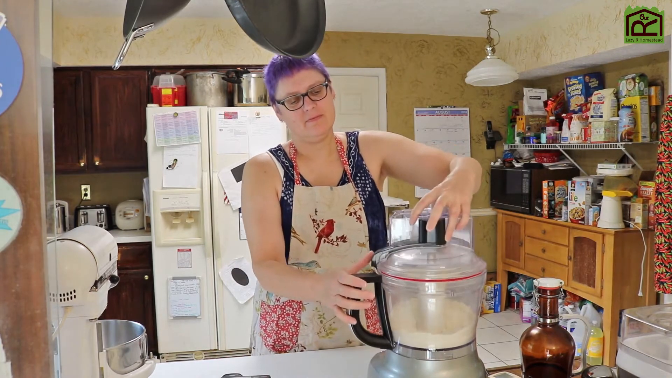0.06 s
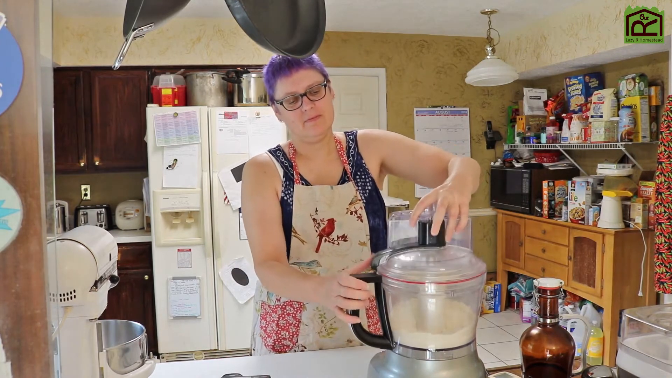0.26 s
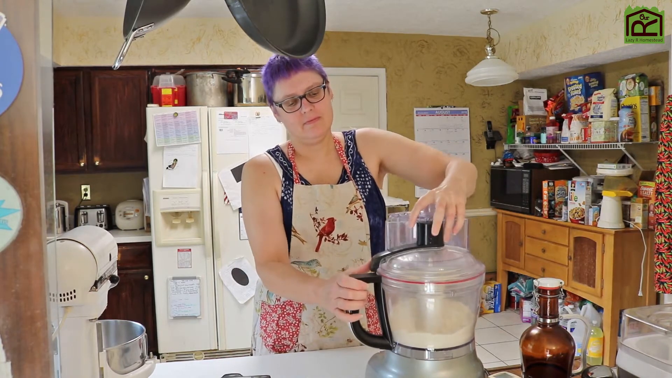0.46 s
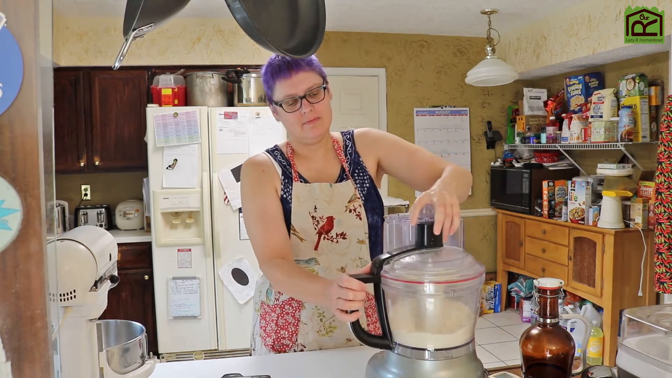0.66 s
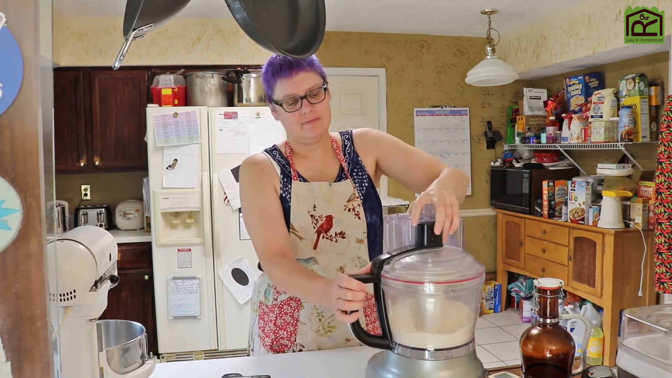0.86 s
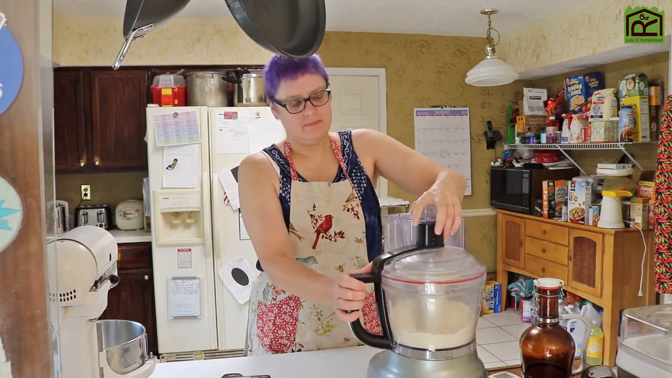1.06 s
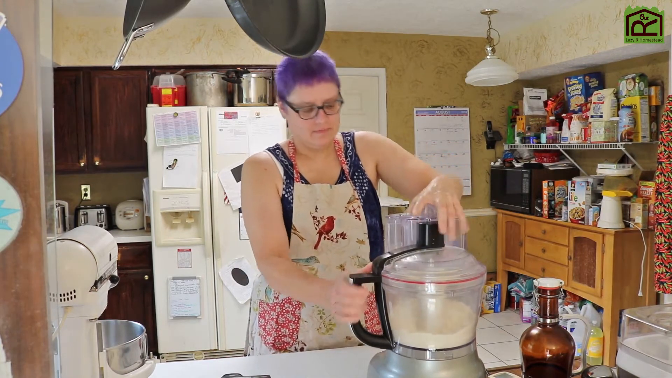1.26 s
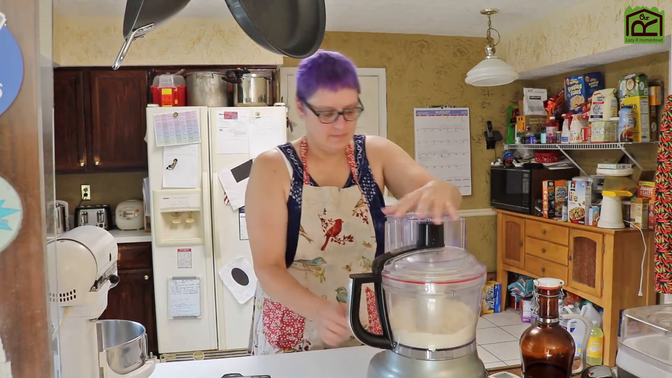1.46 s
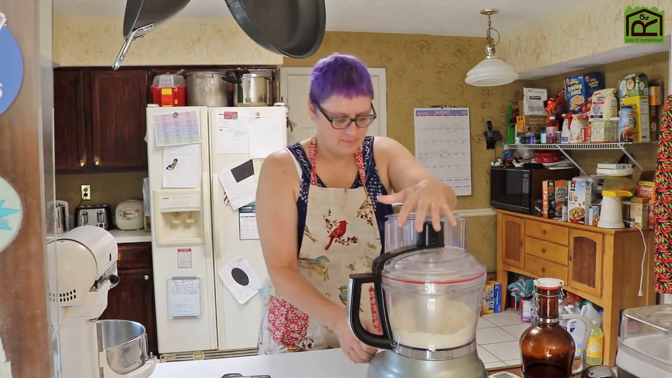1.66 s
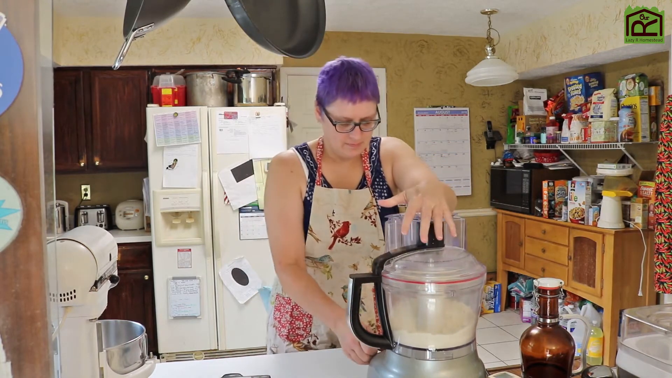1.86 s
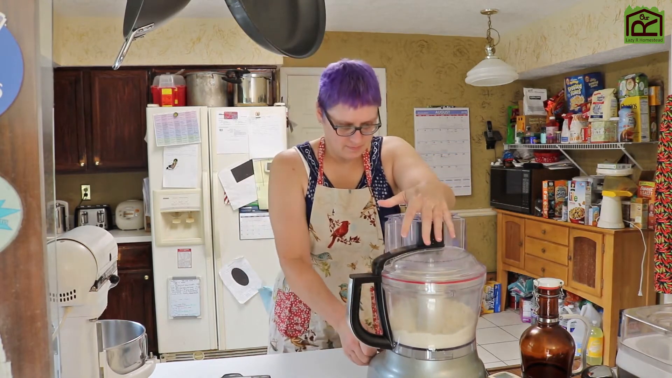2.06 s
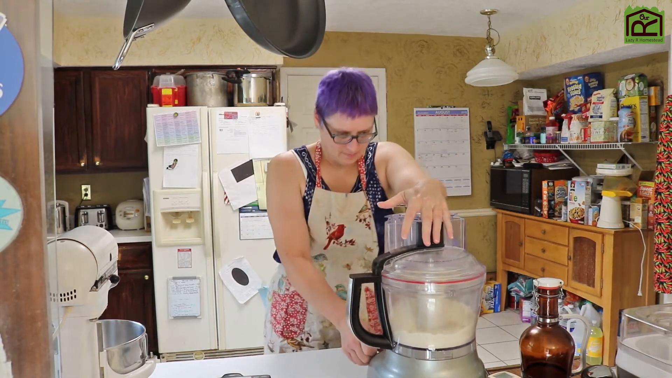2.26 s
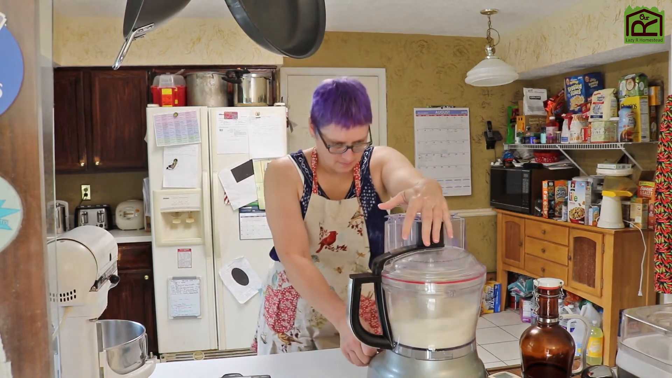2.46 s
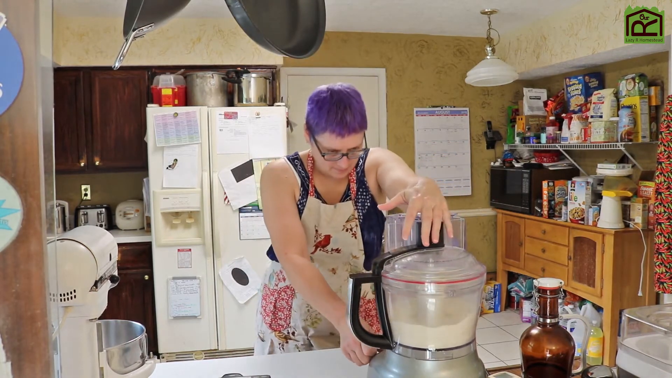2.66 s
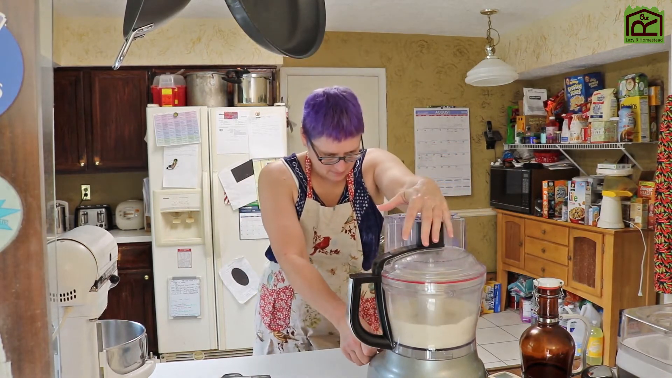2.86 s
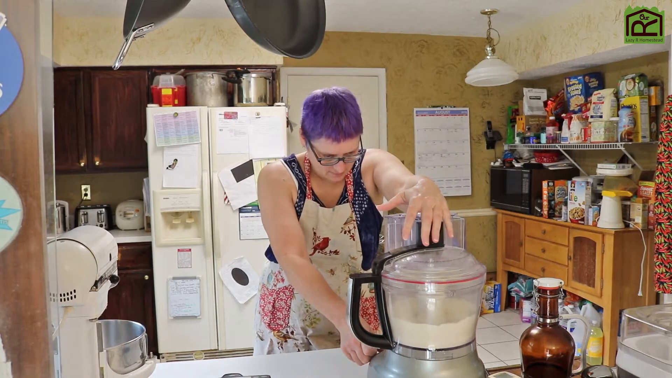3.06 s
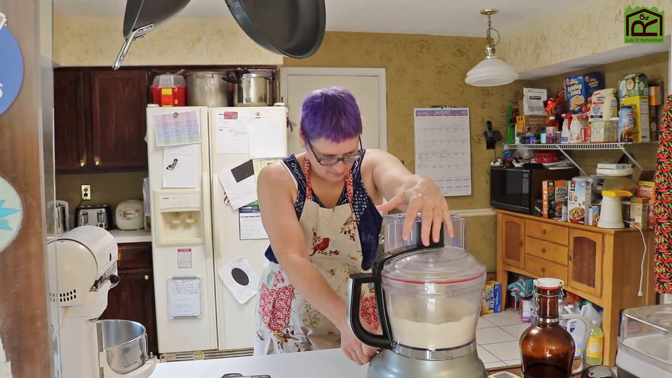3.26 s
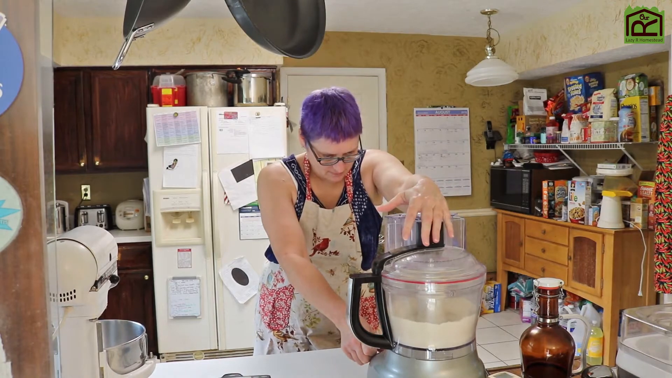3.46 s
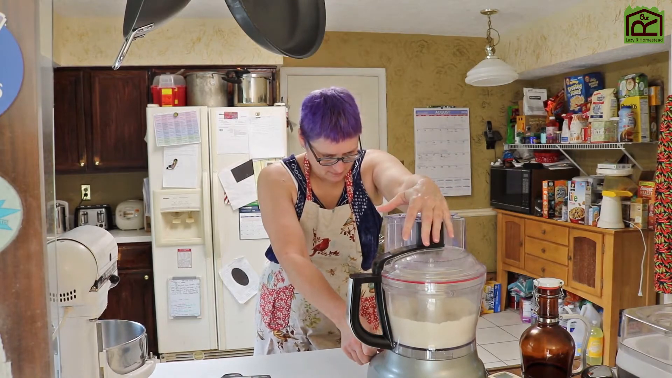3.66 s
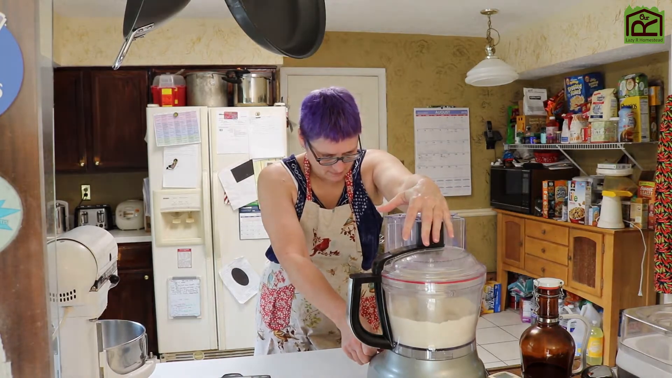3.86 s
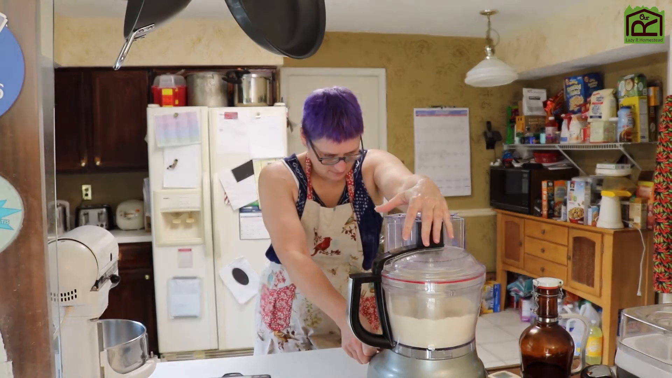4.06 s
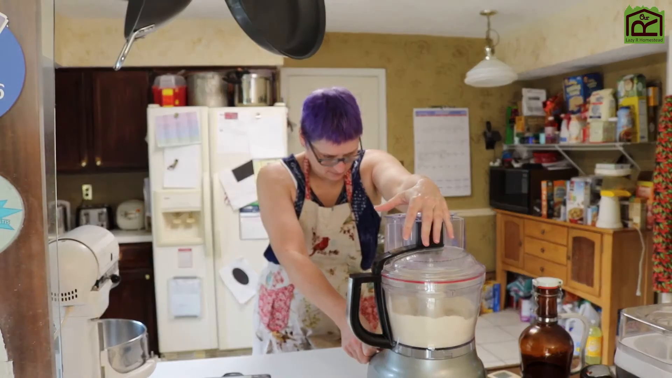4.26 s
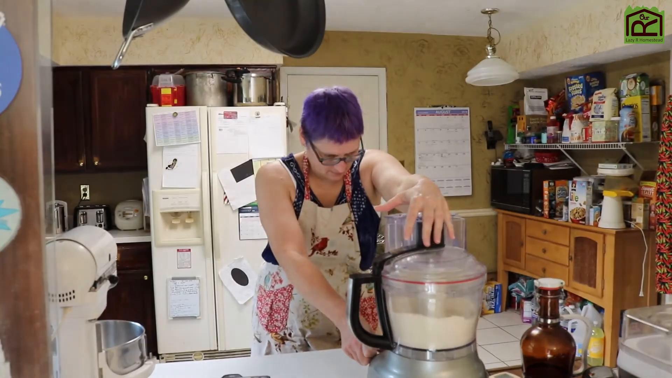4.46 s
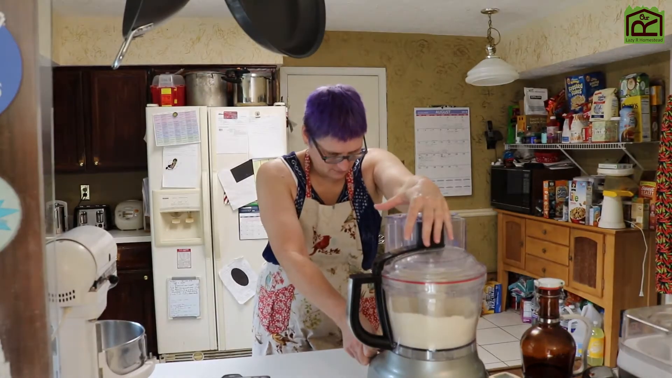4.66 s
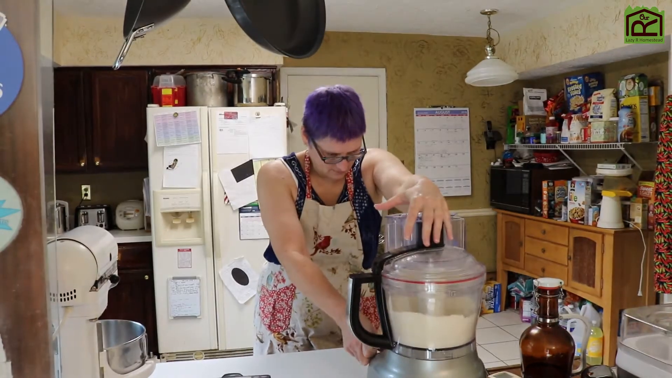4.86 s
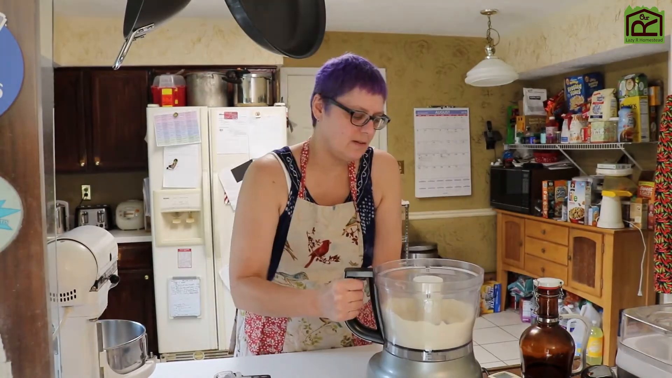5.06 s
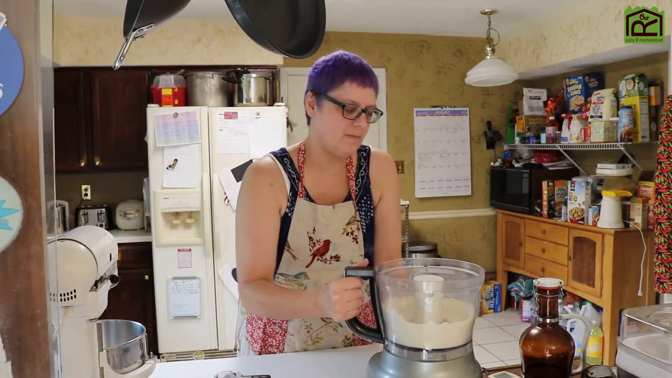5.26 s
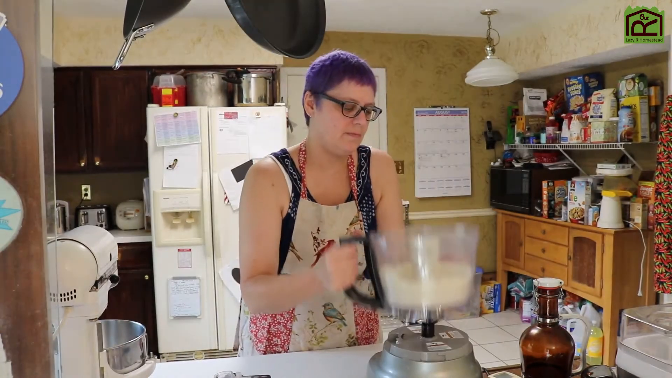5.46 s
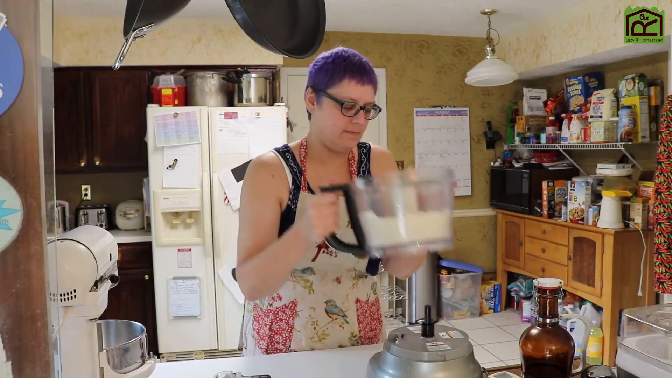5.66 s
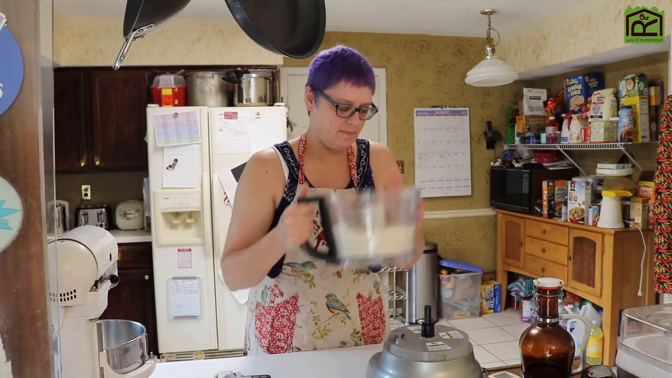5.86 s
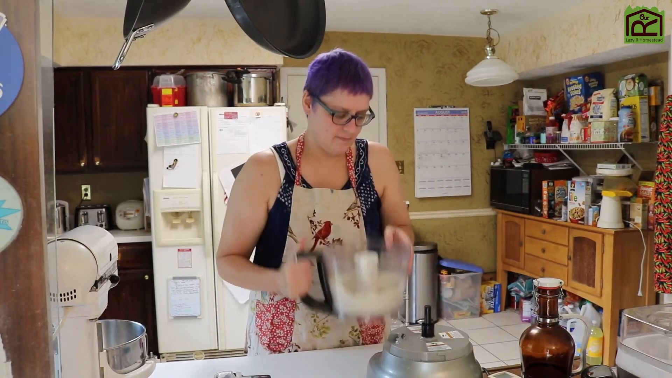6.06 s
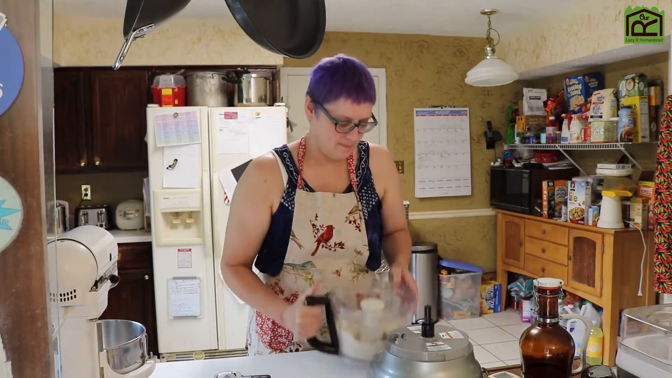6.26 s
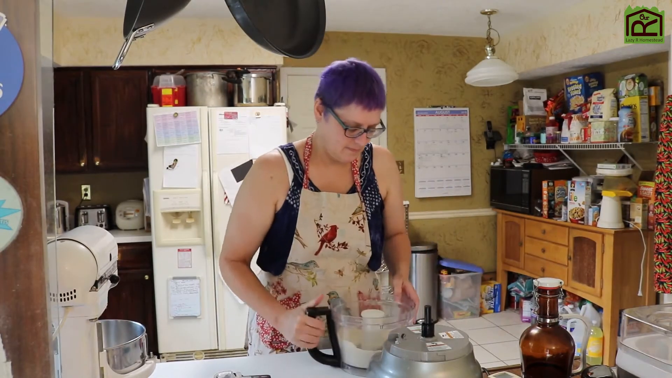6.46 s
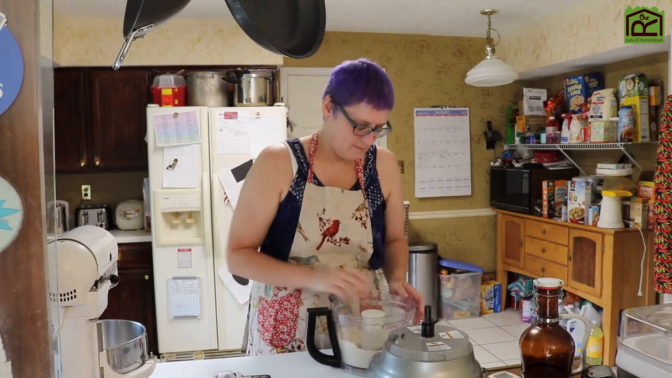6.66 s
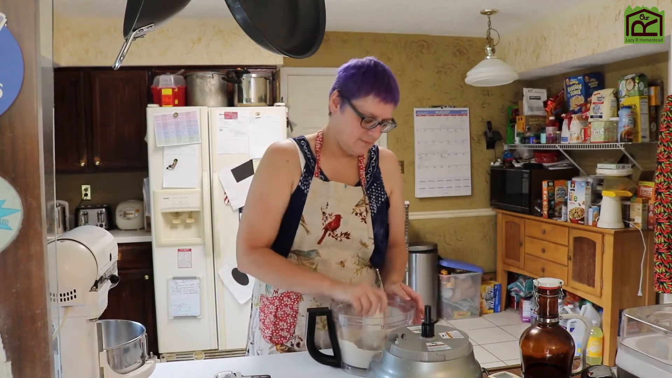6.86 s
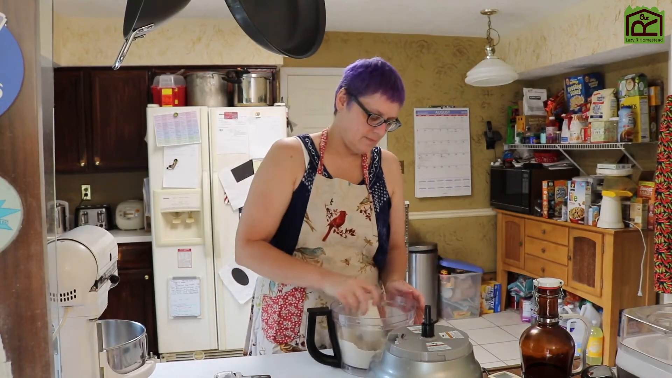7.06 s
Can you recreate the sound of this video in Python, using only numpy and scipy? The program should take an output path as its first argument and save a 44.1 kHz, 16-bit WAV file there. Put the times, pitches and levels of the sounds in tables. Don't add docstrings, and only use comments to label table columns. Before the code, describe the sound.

Close kitchen handling of hard plastic, a buzzing geared motor run suddenly played much faster, then loud bowl clatter and a faintly ringing steel blade.

```python
import sys
import numpy as np
from scipy import signal
from scipy.fft import rfft, irfft, next_fast_len
from scipy.io import wavfile
from scipy.ndimage import uniform_filter1d

SR = 44100
rng = np.random.default_rng(int(sys.argv[2]) if len(sys.argv) > 2 else 0)


def log_audio(samples):
    frames = np.atleast_2d(samples).T
    limited = np.clip(frames, -1, 1)
    pcm = np.round(limited * 32767).astype(np.int16)
    wavfile.write(sys.argv[1], SR, pcm)


def natural_amplitude(level_db):
    exponent = np.asarray(level_db, float) / 20
    return 10 ** exponent


N = 313551
TIME = np.arange(N) / SR
MOTOR_ON_S, HASTE_ON_S, HASTE_OFF_S = 2.231, 3.918, 5.011
HASTE = 6
FULL_SPEED = 51.18

# t/s, level/dB
RUN = [(2.231, -26.5), (2.281, -28), (2.343, -22.5), (2.4, -20.5), (2.531, -14.5), (2.671, -18.5),
       (3.907, -19.5), (3.918, -34)]
# multiple of the shaft speed, level/dB rms
GEARS = [(2, -45), (18, -50), (24, -47), (26, -47), (27, -47), (28, -34), (30, -48), (32, -43), (32.5, -49),
         (34, -45), (36, -42), (38, -45), (39, -44), (40, -48), (42, -45), (43, -43), (44, -47), (45, -44),
         (46, -43), (47, -45), (48, -41), (52, -47), (54, -39), (55, -44), (56, -36.5), (58, -46),
         (60, -47), (64, -43), (65, -46), (70, -44), (72, -38), (74, -43), (76, -41), (77, -43), (79, -43),
         (80, -40), (81, -41), (84, -45), (85, -44), (88, -45), (90, -47), (92, -46), (94, -40), (108, -42),
         (110, -40), (114, -46)]
# f/Hz, level/dB per Hz
ROAR = [(400, -59), (700, -10), (1080, -15), (1400, -8), (2600, -6), (3600, -3.5), (5400, -5.5),
        (8200, -11.5), (9200, -24), (12000, -21), (12800, -33), (15000, -64), (16000, -90)]
# f/Hz, level/dB per Hz
DRONE = [(15, -56), (25, -16), (92, -16.5), (145, -20), (237, -13.5), (419, -15.5), (475, -14.5),
         (1100, -18.5), (1430, -16), (2420, -120)]


def normal_run():
    return motor((MOTOR_ON_S, HASTE_ON_S), 1, [RUN], GEARS, ROAR, DRONE,
                 low_db=(-17, 22), ring_db=(-17, 16), buzz_db=(-35, 7, 5), tone_db=19.0, hiss_db=-3.0,
                 locked=0.84, boom=0.025, unsteady_db=3, swells_per_s=24)


# t/s, level/dB
RUN_FAST = [
    [(3.918, -32), (4.484, -28.5), (4.53, -29), (4.568, -24.5), (4.612, -35.5), (4.644, -49.5), (4.69, -51)],
    [(4.699, -29.5), (4.723, -23), (4.921, -29), (4.969, -23), (5.011, -47)],
]
# multiple of the hastened shaft speed, level/dB rms
GEARS_FAST = [(1.0, -44.5), (1.5, -54), (2.0, -53), (2.5, -63), (3, -59), (3.5, -59), (4.0, -52),
              (4.5, -49), (6.0, -53), (7, -53), (7.5, -52), (12.0, -51), (14, -51), (14.5, -52), (16, -55),
              (16.5, -54), (17.0, -51), (18.0, -54), (20.0, -53), (22.0, -51), (24.0, -43), (25, -52),
              (26.0, -48), (28.0, -36), (29.0, -46), (30.0, -47), (32, -52), (33.0, -53), (34, -55),
              (35, -51), (36.0, -37), (37.0, -39), (38.0, -46), (38.5, -51), (39.0, -44), (40.0, -48),
              (42.0, -49), (42.5, -45), (43.0, -48), (43.5, -50), (45.0, -49), (45.5, -46), (46.0, -37),
              (48.0, -38), (49.5, -52), (50, -51)]
# f/Hz, level/dB per Hz
ROAR_FAST = [(2500, -59), (4000, -3.5), (6000, -4), (8500, 0.5), (10300, -3), (12500, 1), (14500, 1.5),
             (16000, 0.5)]
# f/Hz, level/dB per Hz
DRONE_FAST = [(18, -78), (30, -26), (244, -20), (303, -19), (391, -25), (455, -19.5), (2470, -8),
              (2810, -5.5), (5000, -8), (6500, -40), (11000, -120)]


def hastened_run():
    return motor((HASTE_ON_S, HASTE_OFF_S), HASTE, RUN_FAST, GEARS_FAST, ROAR_FAST, DRONE_FAST,
                 low_db=(-3, -4), ring_db=(-28, 30), buzz_db=(-34.5, 3, 1.5), tone_db=30.5, hiss_db=2.0,
                 locked=0.41, boom=0.12, unsteady_db=3.2, swells_per_s=22)


# multiple of the buzz pitch, level/dB
MAINS = [(.5, -7.5), (1, -2.5), (2, -17), (4, -23), (8, -17)]
# f/Hz, width/Hz, level/dB over the walls
HOUSING = [(506, 34, 10.5), (1020, 65, 9), (1482, 37, 6), (1900, 25, 8.5), (2120, 110, 8), (2300, 30, 7),
           (2667, 106, 8), (3570, 620, 7), (4170, 31, 9), (4700, 230, 1), (5400, 920, 4.5)]
SHAKERS = {24: 16, 48: 9, 56: 8}
# f/Hz, spread/Hz, level/dB
STANDING = [(1345, 25, 6), (2115, 30, 5), (2695, 45, 6), (3595, 80, 5)]


def motor(span, haste, run, gears, roar, drone, low_db, ring_db, buzz_db, tone_db, hiss_db, locked, boom,
          unsteady_db, swells_per_s):
    start = round(span[0] * SR)
    t = TIME[start:round(span[1] * SR)]
    roar_db, = curves(run, t)
    speed, idle_s = shaft(t)
    slip = 1 - speed / FULL_SPEED
    sweep = np.exp(-((speed / FULL_SPEED - 0.62) / 0.27) ** 4) * np.where(idle_s > 0, .55, 1)
    low_db = low_db[0] + low_db[1] * np.minimum(slip, .7)
    ring_db = ring_db[0] + ring_db[1] * sweep
    buzz_db = buzz_db[0] + buzz_db[1] * slip + buzz_db[2] * sweep - 900 * idle_s
    share = speed / speed.max()
    speed = haste * speed
    turns = np.cumsum(speed) / SR

    def sine(cycles, hz, blur=0):
        both, own = wobble(swells_per_s, len(t))
        apart = np.clip(hz / 3000, 0, 1)
        depth_db = 1.5 if blur else unsteady_db
        sides = both + apart * own * np.array([[.5], [-.5]])
        swell = natural_amplitude(1.64 * (apart - 1) + depth_db * sides)
        phase = cycles + blur * own + rng.random() + 0.27 * apart * rng.random((2, 1))
        return np.sqrt(2) * swell * np.sin(2 * np.pi * phase)

    mesh = np.clip((share - .72) / .27, 0, 1) ** (1 + haste / 4) * np.exp(-idle_s / .03)
    spun = np.clip((share - .78) / .15, 0, 1)
    whine = natural_amplitude(7) * np.exp(-((slip - 1 + .75) / .1) ** 2)
    shaking, sung = 0, 0
    for k, db in gears:
        line = natural_amplitude(db) * sine(k * turns, k * speed.max())
        shaking = shaking + natural_amplitude(SHAKERS.get(k, 0) * sweep) * line
        if k < 2:
            gain = np.sqrt(spun * mesh)
        elif k == 2:
            gain = spun
        else:
            gain = mesh + whine * (k == 56)
        sung = sung + line * gain
    sung = filtered(sung, lambda f: natural_amplitude(sum(db * np.exp(-((f / haste - hz) / spread) ** 2)
                                            for hz, spread, db in STANDING)))

    teeth = rng.standard_normal((2, 1800))
    tooth = (turns / 2 % 1 * (1800 // haste)).astype(int)
    hiss = mesh * locked * teeth[:, tooth] + grit(len(t), spiky_db=1)
    hiss = coloured(filtered(hiss, lambda f: 1 + boom * resonances(HOUSING, f / haste)), roar)
    low = coloured(mesh * locked * teeth[::-1, tooth] + grit(len(t), spiky_db=2.5), drone)

    shake = unit(shaking) + .9 * widened(grit(len(t), spiky_db=4))
    ring = unit(filtered(shake, lambda f: resonances(HOUSING, f / haste) ** 2))

    buzz_hz = haste * 480.3
    buzz = 0
    for k, db in MAINS:
        half_db = -3 * (haste > 1 > k)
        buzz = buzz + natural_amplitude(db + half_db) * sine(np.round(2 * k) / 2 * buzz_hz * t, k * buzz_hz, .04 * k)

    machine = natural_amplitude(tone_db) * sung + natural_amplitude(hiss_db) * hiss + natural_amplitude(ring_db) * ring + natural_amplitude(low_db - 3.5) * low
    out = np.zeros((2, N))
    out[:, start:][:, :len(t)] = natural_amplitude(roar_db) * machine + natural_amplitude(buzz_db) * buzz
    return out


# on t/s, off t/s, creep to full speed/s
PRESSES = [
    (2.231, 4.535, .75),
    (4.699, 4.93, .65),
]


def shaft(t):
    pull, free, shortfall, coast_s = 175, 51.35, 9.6, .5

    def clock(s):
        return s + (HASTE - 1) * np.clip(s - HASTE_ON_S, 0, None)

    speed, idle_s = np.zeros(len(t)), np.zeros(len(t))
    for on, off, creep_s in PRESSES:
        driven = np.clip(clock(np.minimum(t, off)) - clock(on), 0, None)
        pulled = np.minimum(pull * driven, FULL_SPEED)
        reached = np.minimum(pulled, free - shortfall * np.exp(-driven / creep_s))
        coasted = np.clip(clock(t) - clock(off), 0, None)
        speed = np.maximum(speed, reached * np.exp(-(coasted / coast_s) ** 2))
        idle_s = np.where(t >= on, np.clip(t - off, 0, None), idle_s)
    return speed, idle_s


# f/Hz, width/Hz, level/dB
PLASTIC = [(785, 20, -13), (1346, 79, -8.5), (2100, 87, -17), (2865, 40, -13), (3600, 71, -10.5),
           (4930, 160, -31), (7400, 1000, -18)]
# t/s, click level/dB, knock over click/dB, click f/Hz
RIM = [(.2219, -19, -11, 2600), (.3644, -28.5, -2, 3200), (.6945, -21, -19, 3500), (.7522, -13, -22, 3530),
       (.7894, -36, 15.5, 1770), (.612, -24.5, 9.5, 2100), (.849, -48, 14, 1500), (.9822, -39, 4, 3100),
       (1.0276, -36, -2, 3110), (1.224, -40, 5, 4050), (1.3059, -49, 12, 2760), (1.4057, -27.5, -4.5, 2090),
       (1.4506, -46, 15.5, 2150), (1.7779, -51, -11, 1870), (1.8013, -62, 22, 2170),
       (1.8512, -65, -10, 2310), (4.6997, -24.5, -32, 2930)]
HANDLE = [(.1314, -43, -3, 1780), (.179, -30, 0.5, 2850), (.3194, -32.5, 5.5, 2620),
          (.6065, -13.5, -7, 2500), (1.8856, -48, 9, 2680), (2.0627, -36.5, 2, 2540),
          (5.468, -44, -1, 2100), (6.9162, -55, -12, 3570)]
BOWL = [(.4504, -26.5, -20, 1590), (2.1231, -36.5, 3, 2710), (2.2313, -16.5, -44, 2300),
        (5.0115, -17, -42, 2340), (5.0472, -1.5, -9, 1880), (5.1003, -17, -11, 1770),
        (6.2894, -45.5, 0, 2480), (6.319, -45, -19, 1750), (6.4128, -7, 1, 1450), (6.4965, -21, -3, 2860),
        (6.6114, -39, 17, 1920), (6.8844, -46, 2, 4530)]
COUNTER = [(.001, -34, 17.3, 1500), (.616, -30.5, 13.4, 1500), (.626, -36, 15, 1200),
           (2.236, -43, 8.6, 600), (5.135, -30.5, 11, 900), (6.545, -24, 4.6, 1500)]
TICKS = [(1.358, -33, -20, 3600), (1.802, -44, -18, 1900), (2.124, -38, -8, 2820), (.179, -27, -20, 3300),
         (1.406, -28.5, -8, 2540), (1.5953, -32, -13, 3500), (1.7779, -35, -12, 2000),
         (.9035, -28, -12, 2980), (1.008, -36, -20, 3200), (1.0765, -32.5, -22, 3900),
         (1.083, -42, -5, 1200), (1.2206, -26.5, -24, 3900), (5.3747, -36, -20, 3800),
         (5.7134, -45, -27, 6030), (5.768, -49, -25, 3500), (6.9815, -25, -20, 2850),
         (6.918, -42, -20, 3500), (6.0262, -45, -22, 2800)]
HUB = [(5.058, -30.5, 17, 1150), (5.078, -33, 16, 1600), (5.178, -42, 19, 1200), (5.207, -42, 18, 1200),
       (6.616, -45.5, 19.5, 1200), (6.9700, -15, -4, 2130), (6.9815, -44, 22, 2800), (7.009, -42, 13, 1200),
       (7.021, -47, 16, 1900), (7.0564, -50, 10, 1870)]
BASE = [(.4504, -50.5, 19.4, 1500), (5.127, -42, 18, 1500), (5.148, -40, 19, 1200), (6.463, -40, 19, 1200),
        (6.531, -42, 18, 1200), (6.558, -39.5, 18, 1200)]
FEET = [(5.131, -43, 18, 900), (6.436, -40, 20, 900), (6.503, -46, 17, 900), (6.541, -44, 20, 900)]
# contacts, knock f/Hz, longest crack/s
STRUCK = [(COUNTER, 211, 0.27), (RIM, 867, 0.47), (HANDLE, 210, 0.18), (BOWL, 493, 0.21), (HUB, 640, 0.27),
          (TICKS, 760, 0.036), (BASE, 333, 0.044), (FEET, 170, 0.054)]


def clicks():
    out, t = np.zeros((2, N + SR)), TIME[:SR // 3]

    def soft(f):
        return 1 / (1 + 1j * f / 7000) ** 2 * (1j * f / (90 + 1j * f)) ** 2

    for contacts, knock_hz, longest in STRUCK:
        for s, db, knock_db, click_hz in contacts:
            t60 = np.clip(0.0065 * natural_amplitude(-0.96 * db), .005, abs(longest) + 0.0054)
            modes = [(hz, width, level + rng.normal(0, 3)) for hz, width, level in PLASTIC]
            blunt_s = .0001 + .01 * longest * np.clip(-db / 40, 0, 1) ** 2
            rise = 1 - np.exp(-t / blunt_s)
            crack = rng.standard_normal(len(t)) * rise * natural_amplitude(-60 * t / t60)
            crack[:9] += 1.8 * natural_amplitude(db / 2) * np.hanning(9)

            def body(f):
                own = resonances([(click_hz, 1.53 * click_hz, 0)], f) ** 2
                return own + 1.78 * resonances(modes, f) / (1 + 1j * f / (5.6 * click_hz))

            crack = filtered(crack, body)
            knock = np.sin(2 * np.pi * knock_hz * t) * natural_amplitude(-60 * t / 0.034)
            knock += 0.86 * np.sin(2 * np.pi * 2.78 * knock_hz * t) * natural_amplitude(-60 * t / 0.0084)
            blow = filtered(natural_amplitude(db + 6) * crack + natural_amplitude(db + knock_db + 5.5) * rise * knock, soft)
            out[:, round(s * SR):][:, :len(t)] += blow + natural_amplitude(-3.0) * kitchen(blow)
    return out[:, :N]


# f/Hz, level/dB per Hz
THUMP = [(22, -29), (42, 0), (70, 7), (120, -8), (200, -70)]
# f/Hz, level/dB per Hz
BOOM = [(70, -36), (130, -14.5), (200, 2), (330, -0.5), (430, -9), (800, -63)]
# f/Hz, level/dB per Hz
RUMBLE = [(250, -39), (400, 0), (520, 3), (750, -3.5), (1100, -9.5), (1600, -10), (3000, -85)]
# f/Hz, width/Hz, level/dB
HOLLOW = [(173, 31, 9.5), (377, 30, 10), (494, 71, 5), (595, 110, 16.5), (744, 73, 19), (864, 400, 15)]
# f/Hz, level/dB per Hz
SCRAPE = [(500, 8.5), (1200, 13.5), (2200, 7.5), (3200, 2), (4600, -1), (6000, -3.5), (10000, -10.5),
          (16000, -27)]
# f/Hz, level/dB per Hz
SLIP = [(700, -30), (1900, 5), (5000, 0), (8500, -1.5), (15000, -16)]
# f/Hz, level/dB per Hz
CLATTER = [(530, -48), (900, -2), (1150, -5.5), (1530, -2), (3040, -9.5), (6480, -16), (14000, -33),
           (16000, -61)]
# t/s, rumble/dB, scrape over it/dB
SLAMS = [
    (5.0495, -13.5, 2),
    (6.414, -5.5, -38),
]


def hands():
    thump, boom, rumble, scrape = handling()
    early = TIME < HASTE_OFF_S
    sound = thump * coloured(grit(N, spiky_db=-2.0), THUMP)
    body = filtered(grit(N, spiky_db=-1.0), lambda f: 0.96 + resonances(HOLLOW, f))
    sound += natural_amplitude(-3.5) * boom * coloured(body, BOOM) + natural_amplitude(1.5) * rumble * coloured(body, RUMBLE)
    rasp = filtered(grit(N, spiky_db=1.0), lambda f: 1 + 0.19 * resonances(PLASTIC, f))
    lid, catch, clatter = coloured(rasp, SCRAPE), coloured(rasp, SLIP), coloured(rasp, CLATTER)
    rub = np.select([early, TIME < SLAMS[0][0]], [lid, catch], clatter)
    sound += natural_amplitude(2 * early + 2.5) * scrape * rub
    return sound * away_from_motor()


# t/s, level/dB
GRIP = [
    [(0, -43), (.595, -44), (1.153, -49.5), (1.275, -56), (1.383, -49.5), (1.563, -58), (1.953, -57.5),
     (2.1, -46.5), (2.22, -53)],
    [(5.011, -39.5), (5.485, -54.5), (5.635, -66), (5.935, -67), (6.0, -65), (6.367, -63), (6.806, -61),
     (6.914, -56.5), (7.11, -65)],
]
# t/s, bowl rumble/dB, boom over it/dB, scrape over it/dB, hold/s
BLOWS = [
    (0.0, -35.5, 8, 2, 0.0034),
    (0.605, -29.5, 8, 0, 0.0046),
    (5.011, -44.5, -7, 21, 0.016),
    (5.048, -27, 0.5, -6, 0.09),
    (5.126, -27.5, 4, -1.5, 0.088),
    (6.414, -24, 5, -11, 0.16),
    (6.969, -31, -12.5, -36, 0.047),
]


def handling():
    effort_db, = curves([*GRIP], TIME)
    lid_db, bowl_db = np.array([[-8.5], [-2], [-4], [-2.5]]), np.array([[-2], [3.5], [-2], [-2]])
    gains = natural_amplitude(effort_db + np.where(TIME < HASTE_OFF_S, lid_db, bowl_db)) ** 2
    release_db_per_s = (130, 96.5, 132, 99)
    for i, (s, db, boom_db, scrape_db, hold_s) in enumerate(BLOWS):
        age = TIME - s
        thump_db = boom_db + (-8 if i == 1 else -23)
        fall_db = 28 * age + np.outer(release_db_per_s, np.clip(age - hold_s, 0, None))
        levels_db = db + np.array([[thump_db], [boom_db], [0], [scrape_db]])
        gains += (age >= 0) * natural_amplitude(levels_db - np.clip(fall_db, 0, 200)) ** 2
    for s, db, scrape_db in SLAMS:
        age = np.clip(TIME - s, -1e-9, 1)
        gains[2:] += (age >= 0) * natural_amplitude(db + np.array([[0], [scrape_db]]) - 60 * age / 0.021) ** 2
    return np.sqrt(gains)


def away_from_motor():
    fade = np.interp(TIME, [MOTOR_ON_S, MOTOR_ON_S + 0.29], [1, 0])
    return np.where(TIME < HASTE_OFF_S, fade, 1)


# f/Hz, level/dB, t60/s
PANEL = [(1480, 0, .16)]
SPINDLE = [(603, 0, .25), (732, 0, .3), (1265, -10, .35), (2013, -12, .5), (2110, -11, .12),
           (2848, -12, .25), (3451, -24, .3)]
BLADE = [(3730, -11, 1.4), (6062, -6, .45), (7550, -3, .4), (8866, -10, .2), (11680, -6, .33),
         (13620, -8, .22)]
# object, t/s, level/dB, build-up/s
RINGS = [
    (PANEL, 2.368, -12, .05),
    (SPINDLE, 5.051, -22, .002),
    (BLADE, 6.425, -46, .01),
    (BLADE, 6.497, -47, .002),
    (BLADE, 6.59, -52, .005),
    (SPINDLE, 6.971, -27, .002),
    (SPINDLE, 7.01, -31, .002),
]


def rings():
    out, t = np.zeros((2, N + SR)), TIME[:SR // 2]
    for modes, s, db, build_s in RINGS:
        for hz, level, t60 in modes:
            swell_db = db + level + 2.5 * wobble(25, len(t)) - 60 * t / t60
            cycles = hz * t + min(hz / 8000, .3) * rng.random((2, 1))
            tone = natural_amplitude(swell_db) * (1 - np.exp(-t / build_s)) * np.sin(2 * np.pi * cycles)
            out[:, round(s * SR):][:, :len(t)] += tone
    return out[:, :N]


# t/s, half length/s, f/Hz, level/dB
RUSTLES = [(0.373, 0.056, 3900, -38.5), (0.43, 0.029, 3600, -35.5), (0.522, 0.055, 3570, -36.5),
           (1.162, 0.041, 3300, -36.5), (1.6, 0.015, 2600, -47), (2.3, 0.017, 2370, -58),
           (0.997, .014, 1020, -38), (1.207, 0.023, 900, -45), (2.3, .045, 1800, -37),
           (4.677, 0.0068, 3600, -50), (4.594, 0.024, 450, -46), (5.106, 0.012, 3200, -24),
           (5.862, 0.011, 750, -53.5), (6.1, 0.03, 2500, -55), (5.471, 0.019, 1570, -41.5),
           (6.345, 0.012, 2500, -53)]


def rustles():
    out = np.zeros((2, N))
    for s, half, hz, db in RUSTLES:
        t = np.arange(-3 * half, 3 * half, 1 / SR)
        rub = widened(grit(len(t), spiky_db=-1.0))
        rub = filtered(rub, lambda f: resonances([(hz, 0.83 * hz, 0)], f) ** 2)
        out[:, round((s - 3 * half) * SR):][:, :len(t)] += natural_amplitude(db) * unit(rub) * np.exp(-(t / half) ** 2)
    return out


# f/Hz, t60/s
KITCHEN = [(200, 0.62), (1000, 0.7), (4000, 0.36), (12000, 0.76)]


def kitchen(x):
    hz, t, z = signal.stft(widened(rng.standard_normal((2, SR // 3))), SR, nperseg=256)
    fading = z * natural_amplitude(-60 * t / along(KITCHEN, hz)[:, None])
    tail = signal.istft(fading, SR, nperseg=256)[1]
    late = np.pad(x, (150, 0))[None]
    return signal.fftconvolve(late, tail / np.linalg.norm(tail[0]), axes=1)[:, :len(x)]


# f/Hz, level/dB per Hz
AIR = [(15, -32), (25, -12), (59, 3), (145, -7.5), (180, 0), (270, -10), (326, -11), (818, -16.5),
       (887, -9), (962, -13), (5570, -19), (16000, -30)]


def hush():
    level_db = -53.5 + 0.49 * (TIME < HASTE_OFF_S)
    out = natural_amplitude(level_db) * coloured(grit(N, spiky_db=1.5), AIR) * away_from_motor()
    a, b = round(HASTE_ON_S * SR), round(HASTE_OFF_S * SR)
    hastened = [(HASTE * hz, db) for hz, db in AIR]
    out[:, a:b] += natural_amplitude(-53) * coloured(grit(b - a, spiky_db=4.5), hastened)
    return out


# f/Hz, likeness
ALIKE = [(60, 0.92), (180, 0.92), (550, 0.76), (1650, 0.23), (4970, 0.17), (15000, 0.055)]


def widened(pair, spectrum=((1, 0),)):
    def split(hz):
        turn = np.arccos(np.clip(along(ALIKE, hz), -1, 1)) / 2
        return natural_amplitude(along(spectrum, hz)) * np.array([np.cos(turn), np.sin(turn)])

    mid, side = filtered(pair, split)
    return np.array([mid + side, mid - side])


def coloured(pair, spectrum):
    return unit(widened(pair, spectrum))


def grit(size, spiky_db):
    scatter = uniform_filter1d(rng.standard_normal(size), size=100) * 10
    return rng.standard_normal((2, size)) * natural_amplitude(spiky_db * scatter)


def resonances(modes, f):
    return sum(natural_amplitude(db) * 1j * f * w / (c * c - f * f + 1j * f * w) for c, w, db in modes)


def filtered(x, response):
    m = next_fast_len(x.shape[-1] + 8192)
    return irfft(rfft(x, m) * response(np.fft.rfftfreq(m, 1 / SR)), m)[..., :x.shape[-1]]


def wobble(rate, size):
    at = np.arange(size) * rate / SR
    return np.array([np.interp(at, np.arange(len(k)), k) for k in rng.standard_normal((2, 400))])


def curves(tables, t):
    rows = list(tables[0])
    for table in tables[1:]:
        rows += [(table[0][0], *rows[-1][1:])] + list(table)
    s, *cols = np.transpose(rows)
    return [np.interp(t, s, c) for c in cols]


def along(points, hz):
    f, v = np.transpose(points)
    return np.interp(np.log(hz + 1), np.log(f + 1), v)


def unit(x):
    return x / np.sqrt(np.mean(x ** 2) + 1e-20)


def scene():
    return normal_run() + hastened_run() + clicks() + hands() + rings() + rustles() + hush()


def roll_off(x):
    return signal.sosfilt(signal.butter(12, 16000, fs=SR, output="sos"), x)


# f/Hz, left minus right/dB
LEAN = [(60, 2.5), (200, 1.2), (2380, 0.0), (8000, -0.1), (15000, 0.5)]


def record(dry):
    side = np.array([[1], [-1]])
    lag_samples, top_hz, bottom_hz = 2.44, 15800, 34
    knee = 5

    def port(hz):
        delay = np.exp(-1j * np.pi * lag_samples * hz / SR * side / (1 + (hz / 4000) ** 2))
        return natural_amplitude(along(LEAN, hz) / 2 * side) * delay * (hz < top_hz)

    ports = filtered(dry, port)
    clipped = ports / (1 + np.abs(ports) ** knee) ** (1 / knee)
    cut = signal.butter(5, bottom_hz, 'high', fs=SR, output='sos')
    return roll_off(signal.sosfilt(cut, clipped))


dry = scene()
out = record(dry)
log_audio(out)
```